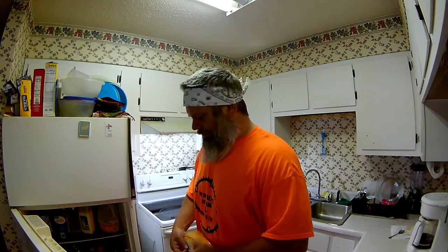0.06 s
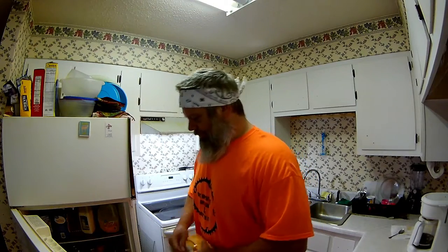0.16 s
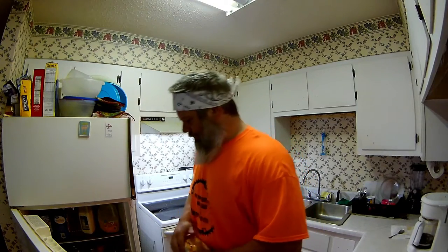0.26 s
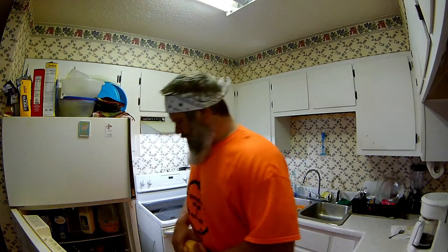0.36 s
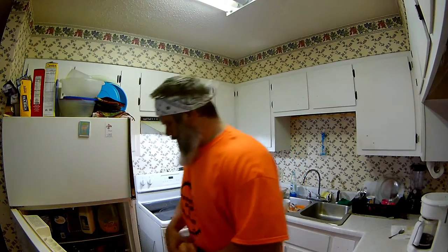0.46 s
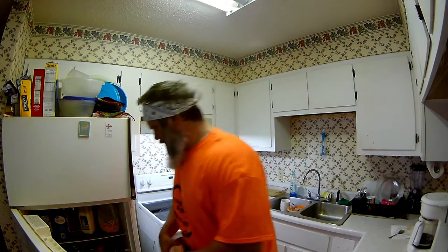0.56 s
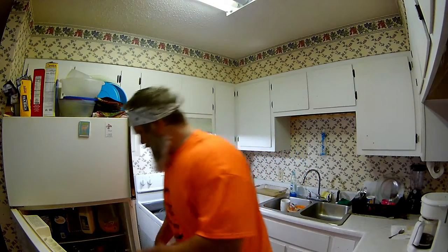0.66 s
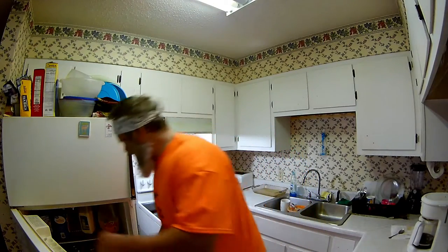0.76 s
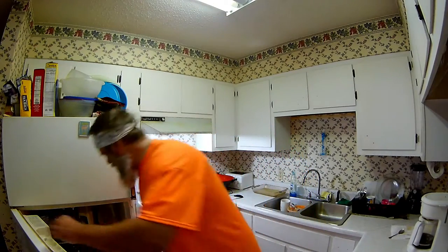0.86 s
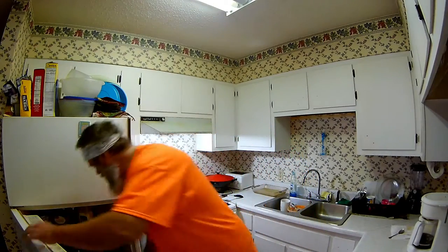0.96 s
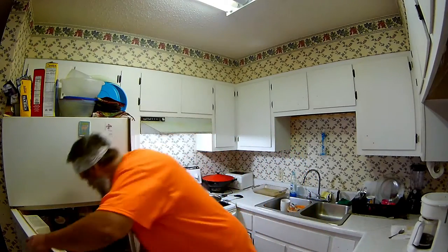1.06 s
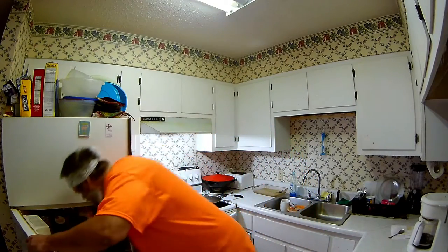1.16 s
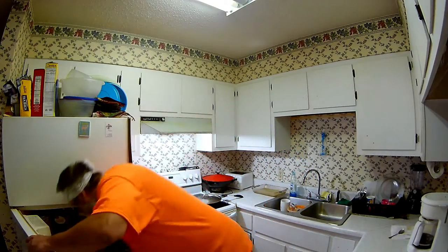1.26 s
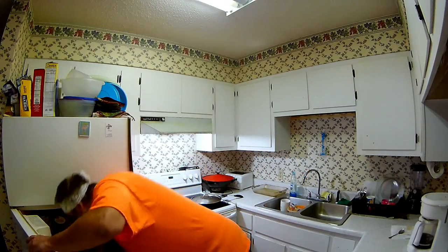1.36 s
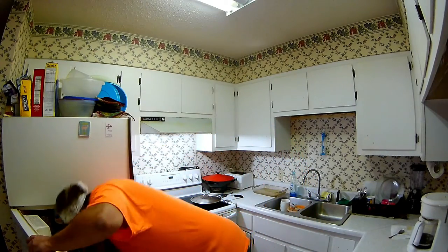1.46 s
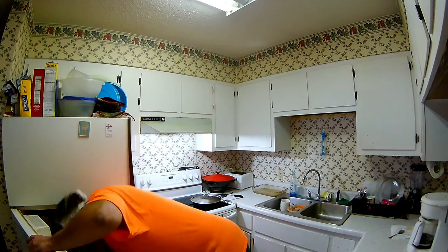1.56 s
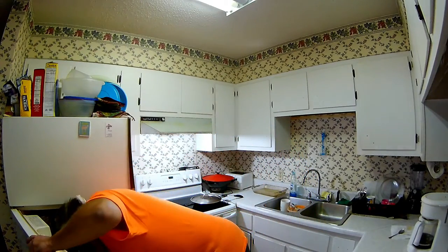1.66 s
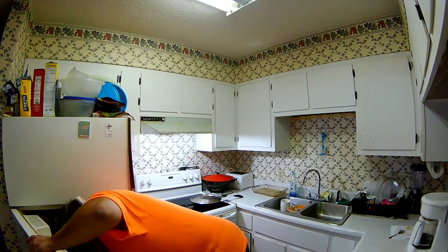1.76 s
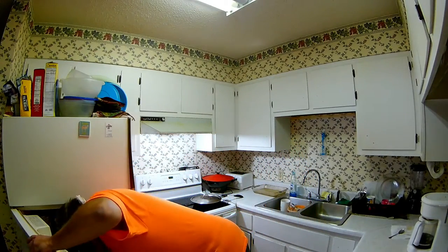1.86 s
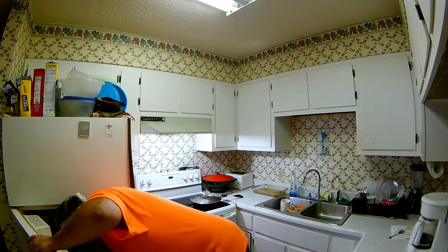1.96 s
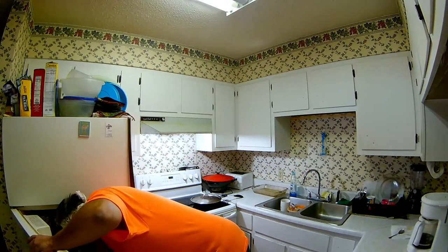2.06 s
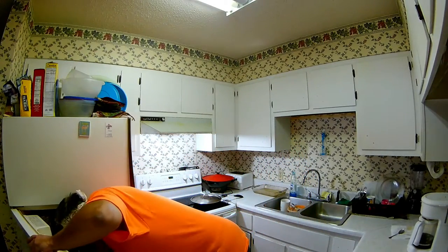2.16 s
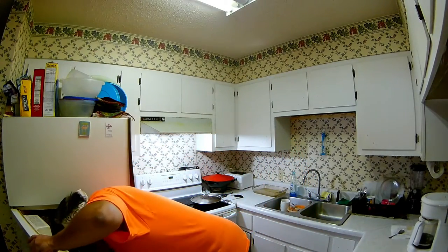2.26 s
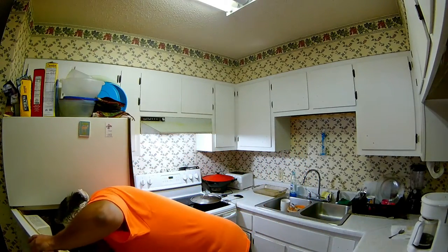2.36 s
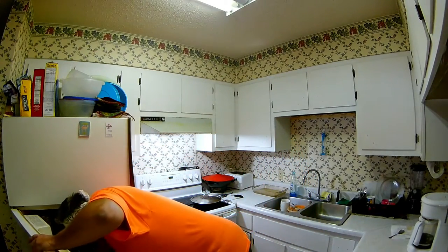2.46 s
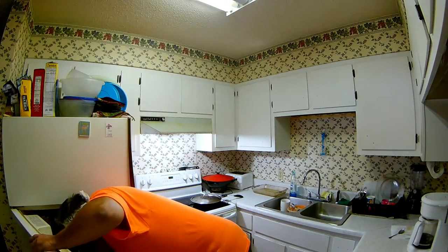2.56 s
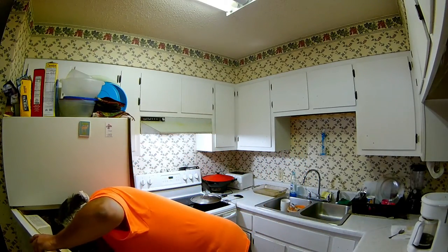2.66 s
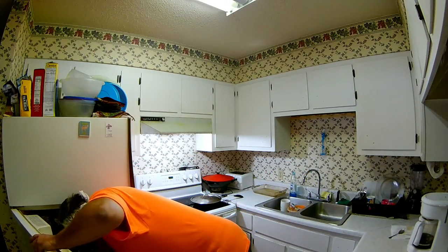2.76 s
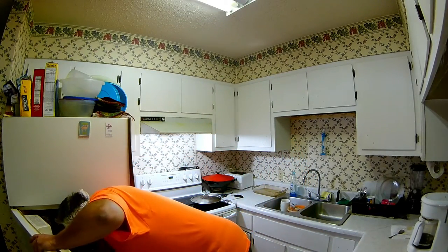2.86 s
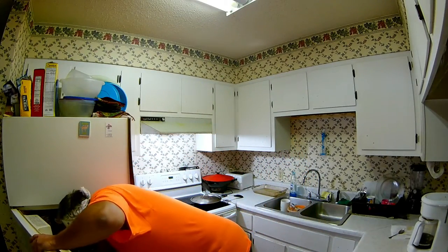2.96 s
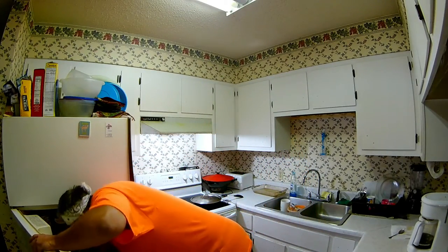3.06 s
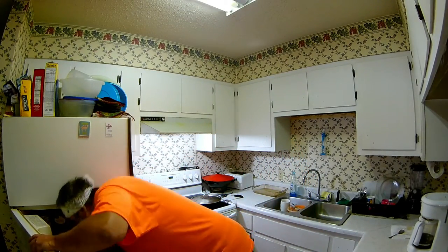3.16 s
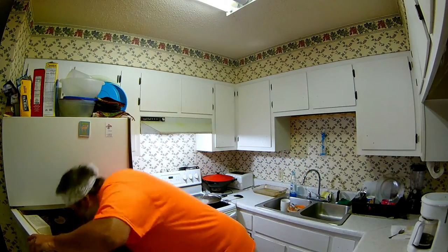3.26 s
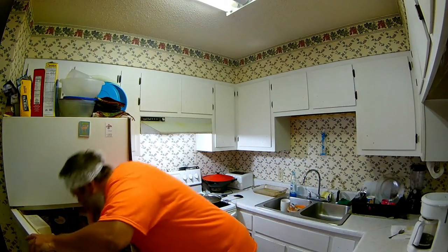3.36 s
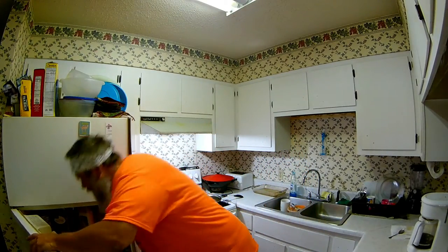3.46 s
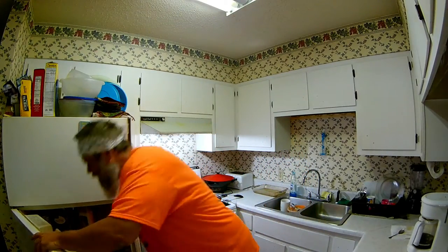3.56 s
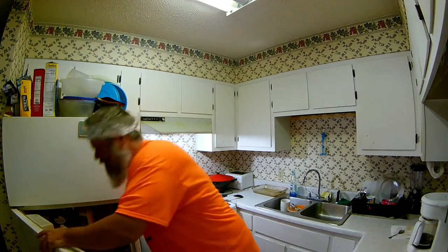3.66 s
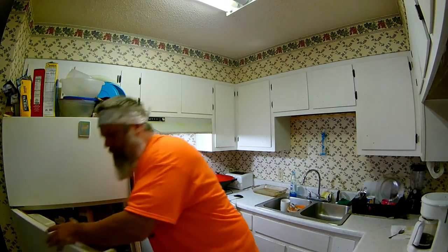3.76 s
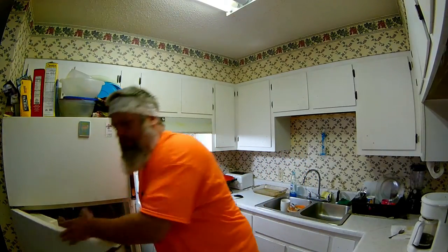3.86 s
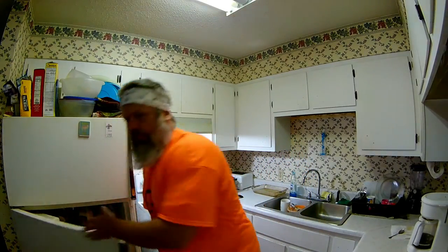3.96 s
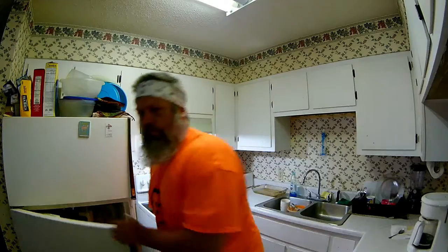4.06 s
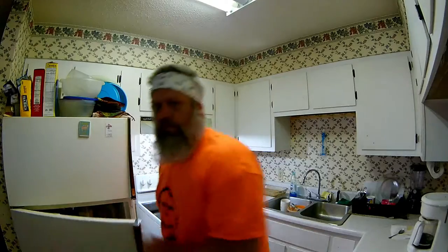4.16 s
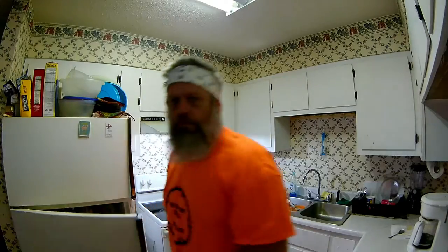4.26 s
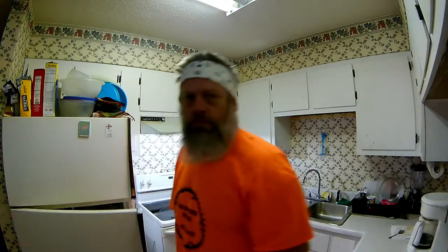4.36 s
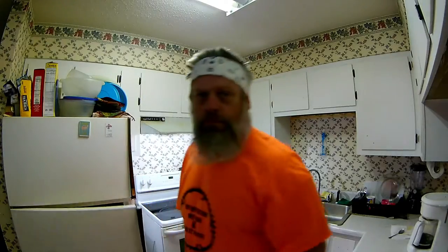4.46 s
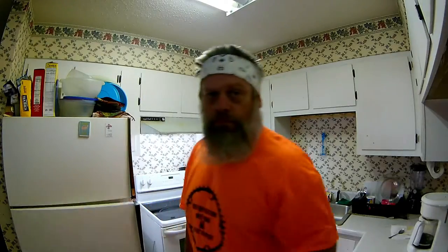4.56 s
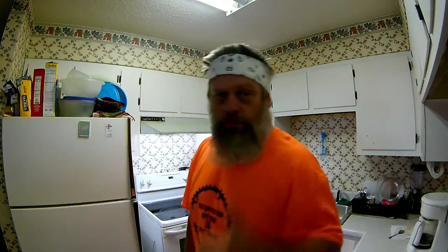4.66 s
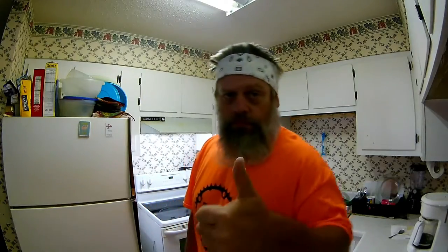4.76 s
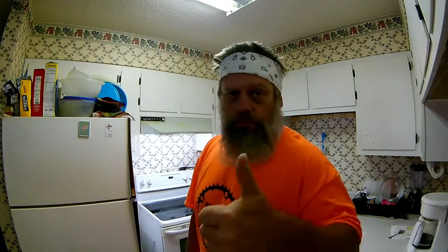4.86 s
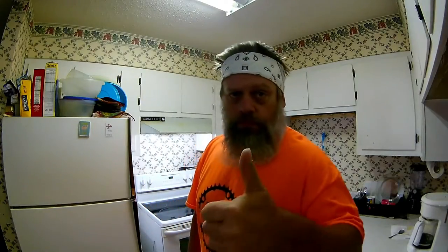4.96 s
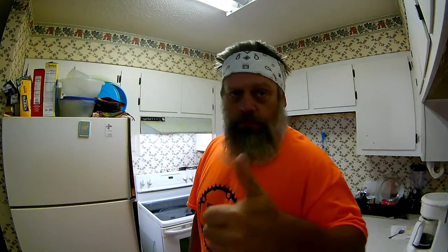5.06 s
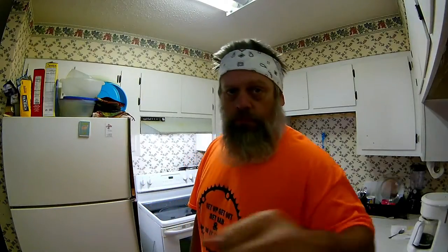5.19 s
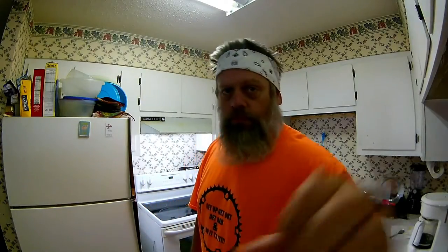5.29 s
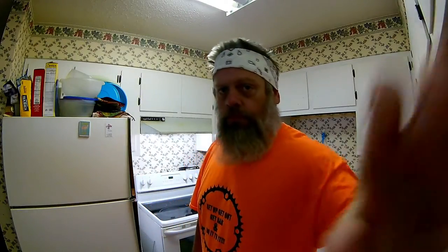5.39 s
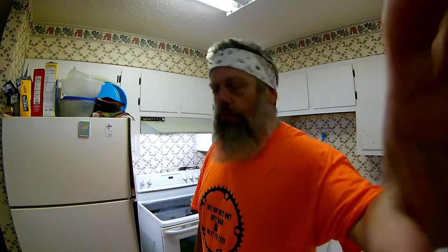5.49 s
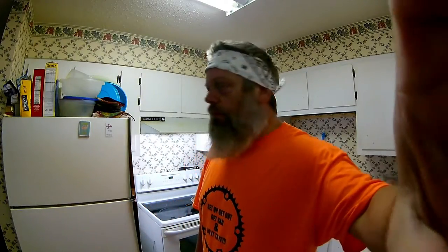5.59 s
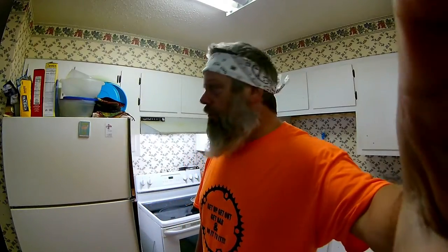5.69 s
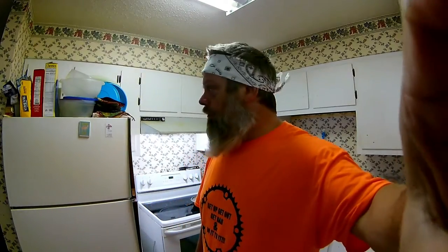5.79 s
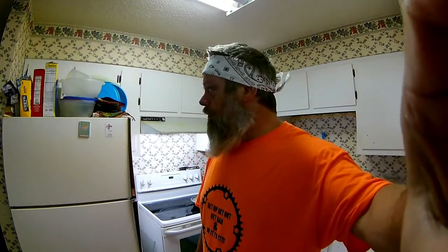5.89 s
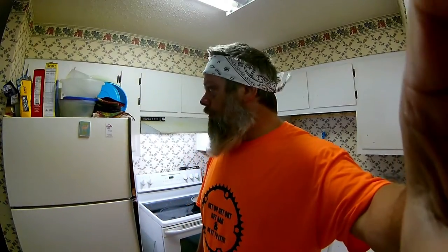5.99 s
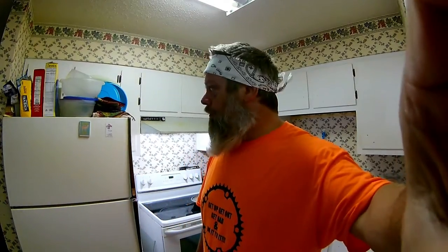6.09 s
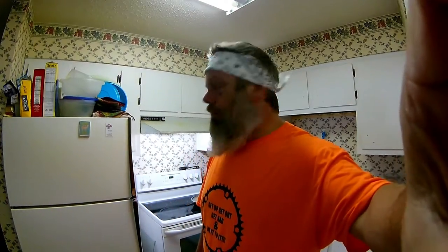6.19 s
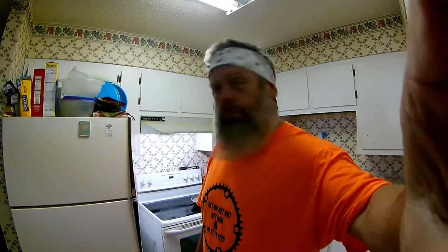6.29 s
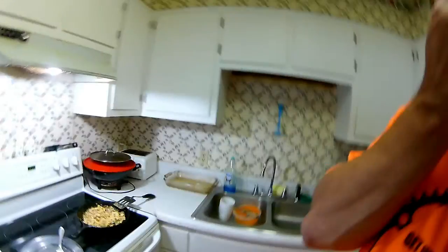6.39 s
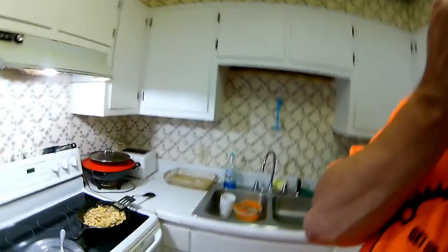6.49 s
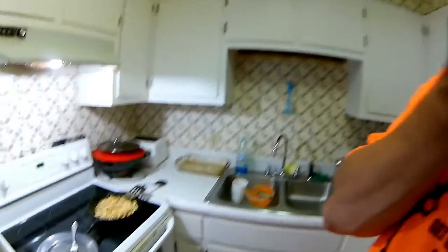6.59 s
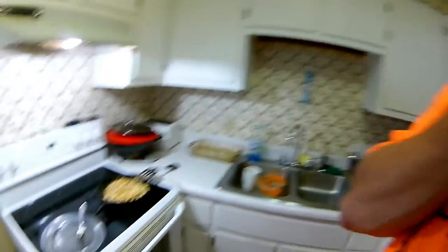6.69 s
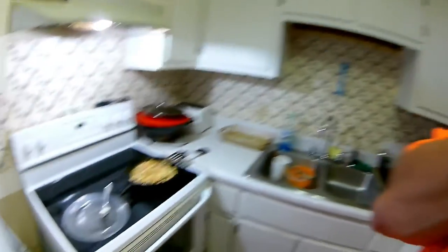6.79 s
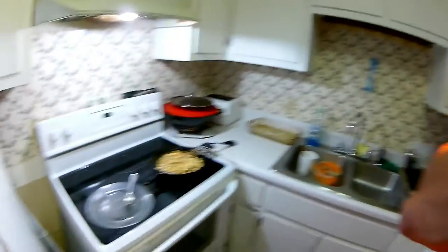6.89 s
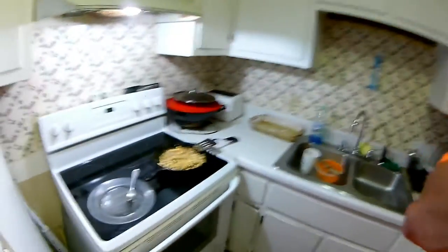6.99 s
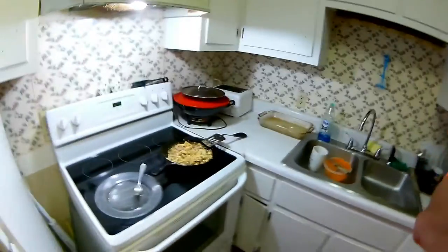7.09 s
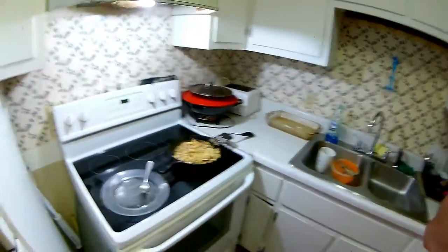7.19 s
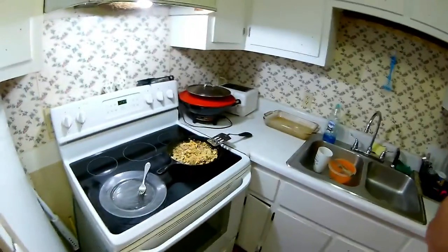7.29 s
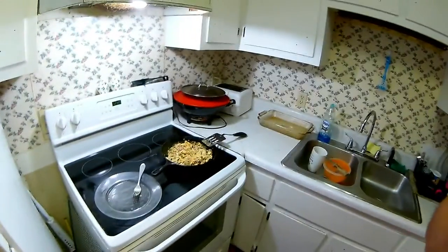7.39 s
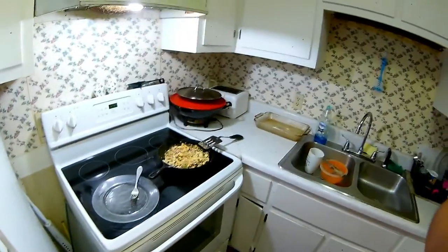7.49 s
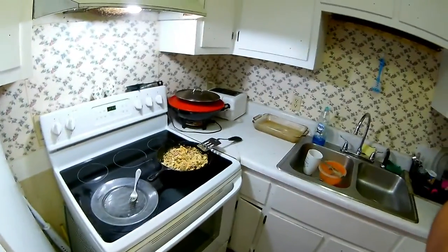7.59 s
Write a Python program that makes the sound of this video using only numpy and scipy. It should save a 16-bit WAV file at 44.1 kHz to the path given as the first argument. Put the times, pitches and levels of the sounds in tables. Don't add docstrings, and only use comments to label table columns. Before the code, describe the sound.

A small, lightly reverberant home kitchen, heard through a modest camera microphone, with faint compressor hum, open-refrigerator fan noise and slight hiss throughout. From 0 to 0.7 seconds a plastic bag crinkles and snaps quickly, fading into faint rubbing until about 1.3. At 1.6 to 1.9 a drawer knocks dully and scrapes out. After a quiet pause, it starts back with a thud at 2.6, slides, and slams at 2.87, the loudest event, a hollow plastic bang with rattling bounces until 3.1. Faint touches come at 3.7 and 4.0. The door swings, its rack clinks at 4.6, and it shuts at 4.73 with a rattle and soft deep thump. From 5.7 to 6.2 fingers scratch and tap the camera closely. Sound drops out briefly until 6.34, then dry handling clicks and rubs continue to 6.8, leaving quiet hum and tiny ticks near 7.0, 7.4 and 7.5.

```python
import sys
import numpy as np
from scipy import signal
from scipy.fft import rfft, irfft, next_fast_len
from scipy.io import wavfile
from scipy.ndimage import uniform_filter1d

SR = 44100
rng = np.random.default_rng(int(sys.argv[2]) if len(sys.argv) > 2 else 0)


def boost(x):
    u = np.asarray(x, float) / 20
    return 10 ** u


def waveform_to_disk(signal):
    frames = np.transpose(np.atleast_2d(signal))
    scaled = np.clip(frames, -1, 1) * 32767
    samples = np.round(scaled).astype(np.int16)
    wavfile.write(sys.argv[1], SR, samples)


N = 336703

# start_s, level_db, contact_ms
DRAWER_BLOWS = [
    (2.58, -10.5, 3),
    (2.712, -24.5, 0.72),
    (2.869, -20.5, 0.38),
    (2.872, -1, 0.56),
    (2.897, -27, 0.4),
    (2.99, -18, 0.66),
    (2.96, -12, .4),
]
# start_s, level_db, contact_ms
DOOR_BLOWS = [
    (4.7295, -22, .4),
    (4.737, -27, 0.84),
]
# pitch_hz, level_db, t60_s
DRAWER_MODES = [(89.6, -39.5, 0.16), (152, -10.5, 0.44), (246, 1, 0.28), (331, -51, 0.16), (444, 7.5, 0.11),
                (583, 3, 0.2), (755, -8.5, 0.015), (809, -1, 0.16), (900, -33.5, 0.014), (1041, -35, 0.24),
                (1220, -33, 0.079), (1460, -32.5, 0.059), (1850, -20, 0.046)]
# pitch_hz, level_db, t60_s
CABINET_MODES = [(84, -17, 0.38), (124, -52, 0.22), (250, -37, 0.097), (480, -33, 0.045), (600, -16, 0.76),
                 (777.5, -26.5, 0.28), (910, -40, 0.024), (1014, -29, 0.47), (1200, -28, 0.24),
                 (1850, -29, 0.011)]
# start_s, peak_db, pitch_hz, t60_s
KNOCKS = [(1.592, -45, 2110, 0.081), (1.703, -30, 900, 0.12), (1.741, -27.5, 250, 0.16),
          (1.79, -20.5, 60.7, 0.087), (2.58, -12.5, 246, 0.25), (2.575, -23.5, 80.2, 0.24),
          (1.795, -18, 337, 0.05), (1.825, -28, 250, 0.073), (2.469, -35, 435, 0.13),
          (2.936, -24.5, 205, 0.13), (2.957, -13, 161, 0.18), (3.697, -37, 234.7, 0.3),
          (3.985, -36, 424, 0.13), (3.985, -47, 1850, 0.041), (4.38, -47.5, 1570, 0.033),
          (4.607, -32, 1506, 0.087), (4.607, -33.5, 2020, 0.085), (4.613, -44.5, 2820, 0.11),
          (4.617, -25, 1200, 0.087), (4.65, -35.5, 284, 0.11), (5.702, -34, 1780, 0.028),
          (5.744, -27.5, 1140, 0.009), (6.366, -36, 776, 0.035), (6.668, -39, 1126, 0.083),
          (7.484, -58, 1220, .04)]
# start_s, peak_db, pitch_hz, t60_s
BAG_SNAPS = [(.027, -37.5, 2020, 0.11), (.092, -30, 1000, 0.057), (.14, -41, 2310, .03),
             (.165, -33, 1030, 0.044), (.25, -28.5, 780, 0.053), (.305, -32, 900, 0.038),
             (.342, -43, 2260, 0.056), (.387, -44, 900, 0.046), (.437, -33, 1120, .05),
             (.486, -27.5, 1018, 0.16), (.525, -45, 2340, 0.035), (.652, -39.5, 2230, 0.16)]
# start_s, peak_db, pitch_hz, t60_s
SMALL_KNOCKS = [(.125, -33, 444, 0.048), (.302, -32, 425, 0.056), (.32, -33, 250, 0.11), (1.659, -33, 1010, 0.074),
                (1.73, -23.5, 337, 0.071), (3.688, -44.5, 230, 0.17), (3.712, -36.5, 239, 0.23),
                (3.99, -43, 1110, .04), (4.015, -44, 1800, 0.054), (4.035, -41, 1200, 0.066),
                (4.73, -21.5, 1041, 0.078), (6.347, -31.5, 1350, 0.029), (6.376, -30.5, 1000, 0.028),
                (6.4, -50, 1287, 0.3), (6.501, -28, 1390, .03), (6.507, -30.5, 1140, 0.046),
                (6.545, -38, 1110, 0.027), (6.552, -40.5, 1130, 0.036), (6.629, -47, 1030, .04),
                (6.734, -43, 815, 0.035), (6.744, -35, 750, 0.056), (6.757, -31, 1066, 0.054),
                (6.758, -32, 1866, 0.023), (6.787, -36.5, 900, 0.046), (6.83, -60, 3380, .08),
                (7.02, -54, 840, .04), (7.048, -45, 1090, .04), (7.054, -45, 800, .04), (7.366, -48.5, 896, .04),
                (7.486, -47, 1120, .04), (7.615, -50, 835, .04),
                (.03, -37, 274, 0.25), (.105, -46, 262, .06), (0.209, -34, 480, 0.1), (.735, -43, 600, 0.14),
           (.74, -44, 1540, 0.074), (2.5, -35, 55, .3), (2.589, -28, 60.4, 0.57), (2.6, -22, 430, 0.18),
           (2.6, -41, 840, .06), (2.77, -30, 600, .15), (2.825, -26.5, 600, .15), (2.9, -16.5, 819, 0.13),
           (2.945, -25, 65, .6), (2.957, -19, 167, .1), (2.99, -29, 430, 0.26), (2.995, -28.5, 588, 0.38),
           (3.995, -41, 476, .1), (4.606, -34, 300, .05), (4.612, -59, 3070, 0.033),
           (4.613, -30, 854, 0.066), (4.635, -42, 1050, .08), (4.74, -17.5, 921, 0.14),
           (4.776, -30, 1032, 0.18), (4.795, -32, 554, .1), (4.84, -41, 1170, 0.23),
           (6.363, -20.5, 1110, 0.016), (6.504, -37, 422, 0.074)]
# start_s, peak_db, pitch_hz, t60_s
PINGS = [(.0225, -37, 2240, 0.013), (.0893, -28, 2090, 0.01), (.0915, -29, 936, .05),
         (.128, -32, 2270, .012), (.13, -28.5, 600, 0.05), (.14, -45, 2350, 0.011), (.163, -25, 970, .02),
         (.2505, -35, 800, .015), (.304, -35, 800, .03), (.387, -33, 816, 0.037), (.434, -33, 1107, .04),
         (.486, -30.5, 2050, 0.011), (0.491, -18.5, 785, 0.016), (.5245, -36, 2320, 0.013),
         (.6385, -27, 2260, 0.017), (.6435, -40, 2080, 0.032), (.6485, -41, 2240, .03),
         (2.563, -21.5, 195, 0.11), (2.6, -26, 300, 0.21), (2.712, -30, 582, .15), (2.716, -29, 438, 0.16),
         (2.73, -27, 315, 0.1), (2.812, -33, 250, .12), (2.885, -12.5, 588, 0.22), (2.899, -15, 813, 0.16),
         (2.914, -10.5, 500, 0.053), (2.897, -19, 454, .15), (3.015, -24.5, 438, .15),
         (3.698, -37, 236.8, .3), (3.984, -36.5, 421, .12), (4.607, -27.5, 1650, 0.018),
         (4.614, -42, 835, 0.089), (4.617, -38, 1156, 0.051), (4.635, -33, 1155, .05),
         (4.765, -32, 575, 0.2), (4.789, -40, 1220, .25), (4.8, -30, 240, 0.17), (4.95, -42, 46, 0.36),
         (6.3532, -25, 1320, .015), (6.3635, -20, 900, 0.018), (6.7598, -31, 1830, 0.019)]
# start_s, peak_db, centre_hz
CRACKLES = [(0.0223, -48, 4860), (0.0892, -43.5, 4350), (0.127, -41, 5840), (0.213, -44, 4590),
            (0.2638, -52, 4850), (0.3037, -43.5, 3870), (0.342, -47, 4700), (0.4361, -54, 4600),
            (0.486, -45, 3840), (0.528, -54, 4360), (0.643, -55, 4220), (1.038, -54, 4700),
            (1.7304, -40.5, 4800), (2.713, -38.5, 4840), (2.885, -51, 3800), (2.9048, -47, 4000),
            (2.9607, -63, 3880), (4.607, -47, 3900), (4.729, -39, 4960), (5.701, -63, 3840),
            (5.7428, -50, 4150), (5.7943, -53, 5780), (5.8184, -53, 6290), (5.8714, -47.5, 4210),
            (6.206, -52, 3990)]
# start_s, length_s, level_db, centre_hz
SCUFFS = [
    (5.785, .055, -60, 6040),
    (6.2, .03, -67, 3900),
    (2.705, 0.027, -62, 3000),
    (4.73, .035, -70, 7700),
]
# start_s, pitch_hz, level_db, t60_s
TRAPPED_AIR = [
    (4.7364, 43.5, -16.5, 0.76),
    (4.738, 29.8, -35, 0.54),
]

# peak_s, rise_s, fall_s, level_db, treble_share_db
BAG_STROKES = [(.008, 0.021, .02, -41, -11.5), (.028, 0.014, 0.066, -45, -7),
               (.075, 0.063, 0.04, -41.5, -18), (.094, 0.013, .035, -37, -8),
               (.132, 0.032, 0.082, -38.5, -12), (.168, 0.043, 0.016, -42, -16),
               (.208, 0.087, 0.051, -40, -12), (.252, .006, 0.16, -42, -32),
               (.304, 0.028, 0.075, -46.5, -12), (.344, 0.013, 0.027, -51.5, -8),
               (.392, 0.038, 0.054, -41.5, -23.5), (.436, 0.034, 0.18, -40.5, -15.5),
               (.497, 0.013, 0.041, -40, -17), (.526, .012, .03, -50, -6.5), (.546, .04, 0.12, -47.5, -21),
               (.642, .006, 0.085, -54, -2.5), (.735, 0.21, 0.31, -56, -21.5),
               (1.04, 0.068, .06, -55.5, -9.5), (1.22, 0.15, 0.081, -55, -16.5)]
DRAWER_STROKES = [(1.598, 0.061, 0.068, -50.5, -4), (1.708, 0.074, 0.13, -40, -6),
                  (1.775, 0.13, 0.057, -39, -12.5), (1.792, .006, 0.12, -37, -17.5),
                  (1.9, .2, 0.32, -52.5, -10), (2.06, 0.24, 0.045, -54.5, -25),
                  (2.48, 0.04, 0.091, -50.5, -40), (2.562, 0.011, 0.12, -35, -31.5),
                  (2.598, 0.042, 0.24, -34.5, -17), (2.66, 0.073, .2, -43.5, -20.5),
                  (2.722, 0.16, 0.19, -37, -12.5), (2.85, 0.32, .1, -36.5, -13),
                  (2.876, 0.016, 0.12, -19, -32.5), (2.932, 0.028, 0.073, -23, -23),
                  (2.966, 0.026, 0.078, -23.5, -18), (3.09, 0.0522, 0.094, -42, -31)]
DOOR_STROKES = [(3.726, 0.076, 0.12, -51, -26), (3.99, 0.012, 0.21, -50, -12), (4.4, 0.11, .3, -56, -15.5),
                (4.59, 0.17, 0.085, -49, -13), (4.612, 0.021, 0.099, -39.5, -15),
                (4.715, 0.2, 0.015, -61, -27), (4.731, 0.0027, 0.041, -26.5, -22.5),
                (4.743, 0.0138, 0.14, -29.5, -18.5)]
GRIP_STROKES = [(5.706, 0.017, 0.014, -72, 7), (5.75, 0.0091, 0.017, -46.5, -17),
                (5.8, .015, 0.027, -51.5, -8), (5.826, 0.026, 0.04, -47.5, -15),
                (5.88, 0.012, 0.028, -52, -9), (5.915, .012, 0.028, -59, -6),
                (5.975, 0.056, 0.073, -43.5, -2.5), (6.035, 0.065, 0.019, -57, 3),
                (6.11, .003, .01, -54, -14), (6.216, 0.019, 0.042, -55, -8.5)]
TURN_STROKES = [(6.35, 0.008, 0.0325, -40.5, -34), (6.372, 0.034, 0.027, -36, -22),
                (6.508, 0.025, 0.034, -41.5, -16), (6.555, 0.023, 0.051, -39, -18),
                (6.595, 0.067, 0.017, -44.5, -17), (6.63, 0.0092, .03, -57, -30),
                (6.678, 0.019, 0.019, -45.5, -34), (6.755, 0.041, 0.019, -39, -29),
                (6.805, 0.052, 0.08, -48, -27), (7.365, .005, 0.034, -57.5, -28),
                (7.488, .007, 0.013, -51, -35)]
# frequency_hz, density_db_per_hz
BAG_BODY = [(60, 1), (240, -0.5), (400, -7.5), (950, -7), (1450, -16), (2250, -19), (3000, -30),
            (4500, -30), (7000, -35.5), (7900, -34)]
DRAWER_BODY = [(40, -17.5), (80, -9), (240, -1.5), (450, -3), (900, -6), (1300, -16.5), (2300, -27),
               (3200, -45), (4800, -44), (6800, -49.5), (7900, -53)]
DOOR_BODY = [(41, -17), (70, -12), (124, -19), (274, -17.5), (327, -23.5), (467, -22), (1010, -22),
             (2140, -35), (2460, -37.5), (6610, -52), (7900, -58.5)]
GRIP_BODY = [(400, -9), (825, -2.5), (1340, -2.5), (2100, -9), (2800, -27), (3500, -11.5), (4340, -4.5),
             (5100, -14), (6000, -17), (7000, -23.5), (7900, -21)]
TURN_BODY = [(180, -39), (300, 15), (572, -15.5), (806, -0.5), (1090, 1), (1950, -6.5), (2280, -28),
             (2930, -38), (3350, -24.5), (3920, -36.5), (7000, -62)]

# frequency_hz, t60_s
KITCHEN = [(100, 0.36), (500, 0.23), (2000, 0.68), (7000, 0.52)]
# pitch_hz, door_open_db, door_shut_db, camera_turned_db, wander_hz
COMPRESSOR_ORDERS = [(28.5, -62, -60, -63, 0.63), (92, -72.5, -64, -82, 2.8),
                     (112.6, -58.5, -63, -59.5, 3.17), (174.4, -61.5, -67.5, -56, 5.38),
                     (233, -69.5, -64, -93, 4.47), (349, -82.5, -102, -67, 1.8),
                     (470, -63.5, -56, -74.5, 0.35), (712, -99, -69, -69, 3.4),
                     (814, -75.5, -77.5, -69, 1.5), (1450, -104, -77, -76.5, 2.3),
                     (1780, -93, -75.5, -99, 3.7), (1865, -96.5, -71, -75.5, 1.5)]
SHUT_S, TURNED_S = 4.36, 6.3
# frequency_hz, density_db_per_hz
FAN_COLOUR = [(100, -41.5), (250, 13.5), (350, 1.5), (500, 3.5), (900, 2.5), (1300, -1), (1600, -16),
              (2500, -19.5), (4000, -40.5)]
# time_s, level_db
FAN_LEVEL = [(0, -55), (1, -52), (2.3, -53), (3.399, -51), (4.3, -55.5), (4.55, -55.5), (4.72, -46),
             (4.8, -60), (7.7, -59.5)]
# frequency_hz, density_db_per_hz
AIR_COLOUR = [(12, -41), (20, -7.5), (65, -2), (172, -2.5), (313, -11.5), (434, -10.5), (468, -7),
              (504, -12.5), (716, -27), (1340, -32), (1850, -20.5), (2100, -30), (7900, -39)]

# frequency_hz, density_db_per_hz
TOP_COLOUR = [(7400, -20.5), (8000, -5), (8600, -0.5), (11800, -0.5), (15100, -2.5), (16000, -1)]
# from_s, share_db
SHEEN = [(0, 0), (1.5, 1.5), (2.3, -4), (4.7, 3), (5.2, -4.5)]
# start_s, gain_db, recovery_s
DUCKS = [
    (2.624, -5, .08),
    (2.919, -6, .25),
    (3.036, -2, .03),
    (4.771, -3, .2),
]
# from_s, to_s, gain_db
GAPS = [
    (0.808, 0.824, -33),
    (6.229, 6.344, -140),
]


def evened(x):
    return x / np.sqrt(np.mean(x ** 2) + 1e-20)


def read(points, hz):
    f, value = np.transpose(points)
    return np.interp(np.log(hz + 1), np.log(f + 1), value)


def add(mix, start_s, sound):
    part = mix[round(start_s * SR):][:len(sound)]
    part += sound[:len(part)]


def coloured(x, spectrum, lo_hz=0., hi_hz=29900.0):
    size = next_fast_len(len(x))
    hz = np.fft.rfftfreq(size, 1 / SR) + 1e-3
    edges = 1 / np.sqrt((1 + (lo_hz / hz) ** 8) * (1 + (hz / hi_hz) ** 8))
    return evened(irfft(rfft(x, size) * boost(read(spectrum, hz)) * edges, size)[:len(x)])


def slow(rate_hz):
    knots = rng.standard_normal(int(N / SR * 60) + 2)
    pole = np.exp(-2 * np.pi * rate_hz / len(knots) * N / SR)
    smooth = signal.lfilter([1], [1, -pole], knots)
    return np.interp(np.arange(N), np.linspace(0, N, len(knots)), evened(smooth))


def ring(hz, db, t60, turn=0., span_s=.5):
    t = np.arange(int(span_s * SR)) / SR
    return boost(db - 60 * t / max(t60, .01)) * np.sin(2 * np.pi * (hz * t + turn))


def struck(blows, modes):
    out = np.zeros(N)
    spots = rng.uniform(-1, 1, (len(blows), len(modes), 2))
    for (s, db, contact_ms), spot in zip(blows, spots):
        push = np.sin(np.linspace(0, np.pi, int(contact_ms * SR / 1000) + 3))
        body = 0
        for (hz, mode_db, t60), (strength, detune) in zip(modes, spot):
            body = body + ring(hz, mode_db + 2 * strength, t60)
            body = body + ring(hz * (1 + detune / 25), mode_db - 6, t60 * .5)
        add(out, s, boost(db - 12.5) * np.convolve(body, push / push.sum()))
    return out


def knocks(rows, spacing, count=2):
    out, t = np.zeros(N), np.arange(800) / SR
    for (s, db, hz, t60), noise in zip(rows, rng.standard_normal((len(rows), 800))):
        cluster = 0
        for k in np.arange(-count, count + 1) + .3 * noise[:2 * count + 1]:
            mode_db = db - 6 - 8 * abs(k) / count - count
            turn = k * k / 7 / count * 2
            cluster = cluster + ring(hz * (1 + spacing * k), mode_db, t60, turn, np.clip(t60, .01, .5))
        swell = np.minimum(np.arange(len(cluster)) / SR / (1 / hz + 0.00032), 1)
        crack = signal.lfilter([.4], [1, -.6], noise) * boost(db - 34.5 - 60 * t / 0.032)
        add(out, s, cluster * swell)
        add(out, s, crack)
    return out


def rub(strokes, body, slips_per_s, spread_db, bass_db, round_top, edges_hz=(400, 1900, 0),
        modes=(), ringing=0.):
    slips = (rng.random(N) < slips_per_s / SR) * boost(spread_db * np.minimum(rng.exponential(1, N), 4))
    grain = np.sqrt(abs(signal.lfilter([1], [1, -np.exp(-1 / (0.0064 * SR))], slips ** 2)))
    drive = (evened(grain) + 0.6) * rng.standard_normal(N)
    if modes:
        response = sum(ring(hz, 0, t60) for hz, _, t60 in modes)
        drive = evened(drive) + ringing * evened(signal.oaconvolve(drive, response)[:N])
    low_hz, high_hz, floor_hz = edges_hz
    middle = coloured(drive, body, low_hz, high_hz)
    treble = coloured(drive, body, high_hz)
    bass = coloured(drive, body, floor_hz, low_hz)
    power = np.zeros((3, N))
    for s, rise, fall, db, treble_db in strokes:
        rise, fall = np.clip([rise, fall], .003, .5)
        at = np.arange(max(int((s - 2 * rise) * SR), 0), min(int((s + 2 * fall) * SR), N))
        distance = np.maximum((s - at / SR) / rise, (at / SR - s) / fall)
        slack_db = -20 * distance ** round_top
        heavy_db = 0.24 * (db + 39.5)
        power[:, at] += boost([db + slack_db,
                             db + treble_db + 1.2 * slack_db,
                             db + bass_db + heavy_db + 0.85 * slack_db]) ** 2
    return (np.sqrt(power) * (middle, treble, bass)).sum(0)


def pings():
    out = np.zeros(N)
    for s, db, hz, t60 in PINGS:
        sound = ring(hz, db, t60, span_s=np.clip(t60, .01, .5))
        add(out, s, sound * np.minimum(np.arange(len(sound)) / SR * hz / 1.5, 1))
    return out


def crackles():
    out, t = np.zeros(N), np.arange(1500) / SR
    for (s, db, hz), noise in zip(CRACKLES, rng.standard_normal((len(CRACKLES), 1500))):
        band = signal.butter(1, [hz * 0.82, min(hz * 1.19, 7800)], "band", fs=SR)
        envelope = boost(db - 9.0 - 60 * t / 0.064) * np.minimum(t / 0.0013, 1)
        add(out, s, evened(signal.lfilter(*band, noise)) * envelope)
    return out


def scuffs():
    out = np.zeros(N)
    for (s, length, db, hz), noise in zip(SCUFFS, rng.standard_normal((len(SCUFFS), 4000))):
        band = signal.lfilter(*signal.butter(2, [hz * 0.94, hz * 1.05], "band", fs=SR), noise)
        push = np.sin(np.pi * np.minimum(np.arange(len(noise)) / SR / length, .999)) ** .5
        add(out, s, boost(db) * evened(band) * abs(push))
    return out


def boom():
    seat_s, seat_db, choke_db_per_s = 4.814, -11, 15
    push_s, push_length_s, push_db = 5.8, 0.0073, -29
    out = np.zeros(N)
    after = np.maximum(np.arange(N) / SR - seat_s, 0)
    add(out, push_s, -boost(push_db) * np.sin(np.linspace(0, np.pi, int(push_length_s * SR))))
    for s, hz, db, t60 in TRAPPED_AIR:
        add(out, s, ring(hz, db, t60, span_s=1.))
    return out * boost(seat_db * np.minimum(after / 0.0045, 1) - choke_db_per_s * after)


def kitchen(x):
    taps = np.zeros(SR // 2)
    at = np.arange(200, SR // 2 - 20, 20)
    taps[at + rng.integers(0, 20, len(at))] = rng.choice([-1., 1.], len(at))
    hz, t, z = signal.stft(taps, SR, nperseg=256)
    decay = boost(-60 * t / read(KITCHEN, hz)[:, None])
    tail = signal.istft(z * decay, SR, nperseg=256)[1]
    return signal.fftconvolve(x, tail / np.linalg.norm(tail))[:N]


def compressor():
    t, out = np.arange(N) / SR, np.zeros(N)
    turning_points = [SHUT_S - .2, SHUT_S + 0.18, TURNED_S, TURNED_S + .02]
    for hz, open_db, shut_db, turned_db, wander_hz in COMPRESSOR_ORDERS:
        level_db = np.interp(t, turning_points, [open_db, shut_db, shut_db, turned_db])
        turns = np.cumsum(hz + wander_hz * slow(6.01)) / SR
        out += np.sqrt(2) * boost(level_db + 1.93 * slow(3.2)) * np.sin(2 * np.pi * turns)
    return out


def fan():
    s, fan_db = np.transpose(FAN_LEVEL)
    level_db = np.interp(np.arange(N) / SR, s, fan_db) + 0.72 * slow(1.8)
    return coloured(rng.standard_normal(N), FAN_COLOUR) * boost(level_db)


def air():
    return boost(-53.5 + slow(2) / 2) * coloured(rng.standard_normal(N), AIR_COLOUR)


def scene():
    rumble_cut = signal.butter(2, 130, "high", fs=SR)
    hits = signal.lfilter(*rumble_cut, struck(DRAWER_BLOWS, DRAWER_MODES))
    hits += struck(DOOR_BLOWS, CABINET_MODES) + knocks(KNOCKS, 0.035) + crackles()

    strokes = rub(BAG_STROKES, BAG_BODY, 330, 1.6, -25, 1.7, (450, 1900, 0))
    strokes += knocks(BAG_SNAPS, 0.0355, count=5)
    strokes += rub(DRAWER_STROKES, DRAWER_BODY, 550, 2.5, -1.9, 1.08, (400, 1900, 55),
                   modes=DRAWER_MODES, ringing=0.16)
    strokes += rub(DOOR_STROKES, DOOR_BODY, 590, 7.1, -2.5, 1.0, (400, 1900, 80),
                   modes=CABINET_MODES[2:], ringing=0.12)

    hand = rub(GRIP_STROKES, GRIP_BODY, 570, 1.0, -38.5, 1.4, (500, 2700, 0))
    hand += rub(TURN_STROKES, TURN_BODY, 530, 2.1, -32, 1.34, (500, 2600, 0))

    room = boost(-3.5) * kitchen(hits) + boost(-11.0) * kitchen(strokes)
    small = knocks(SMALL_KNOCKS, 0.046, count=3) + pings() + scuffs()
    background = compressor() + fan() + air()
    return (hits + strokes + hand + small + boom() + room + background)[None]


def roll_off(x):
    return signal.sosfilt(signal.butter(12, 15780, fs=SR, output="sos"), x)


def record(dry):
    t = np.arange(N) / SR
    narrow = signal.sosfiltfilt(signal.butter(14, 7600, fs=SR, output="sos"), dry[0])

    treble = signal.sosfilt(signal.butter(6, 7000, "high", fs=SR, output="sos"), narrow)
    treble_db = 10 * np.log10(uniform_filter1d(treble ** 2, 700) + 1e-14)
    since, share_db = np.transpose(SHEEN)
    share_now_db = share_db[np.searchsorted(since, t, "right") - 1]
    lift_db = 1.12 * np.maximum(treble_db - np.median(treble_db) - 4.0 + share_now_db, 0)
    hiss = coloured(rng.standard_normal(N), TOP_COLOUR, 6200)
    lifted = signal.sosfilt(signal.butter(14, 12900, fs=SR, output="sos"), hiss)
    top = boost(-75.5) * (hiss + 0.67 * (boost(lift_db) - 1) * lifted)

    mix = 0.69 * np.tanh(narrow / 0.86)
    for s, db, recovery in DUCKS:
        mix = mix * boost(db * np.exp(-np.maximum(t - s, 0) / recovery) * np.clip((t - s) / 0.0013, 0, 1))
    resume_s = GAPS[1][1]
    jump = boost(-33.5) * np.exp(-abs(t - resume_s) / 0.0014)
    mix = mix + 0.87 * top - jump
    for start, end, db in GAPS:
        mix = mix * np.where((t > start) & (t < end), boost(db), 1)
    return roll_off(mix[None])


dry = scene()
out = record(dry)
waveform_to_disk(out)
```